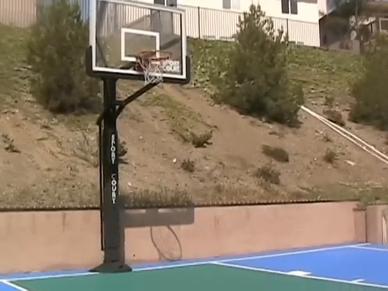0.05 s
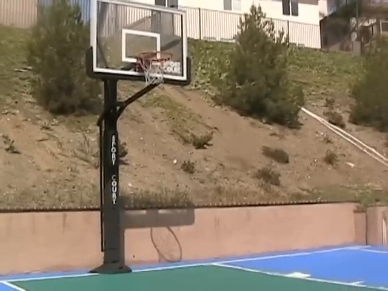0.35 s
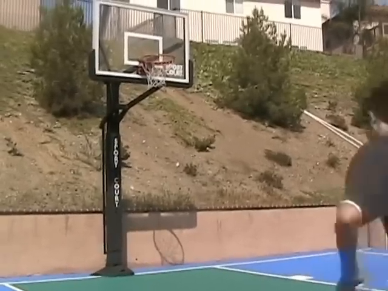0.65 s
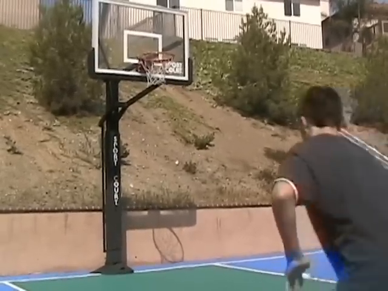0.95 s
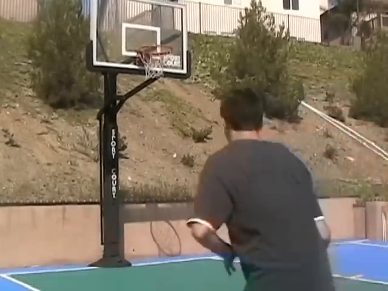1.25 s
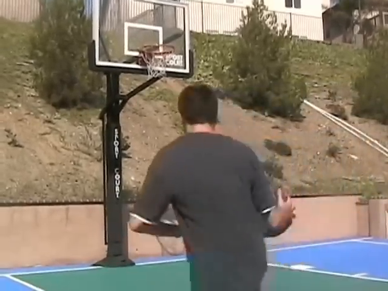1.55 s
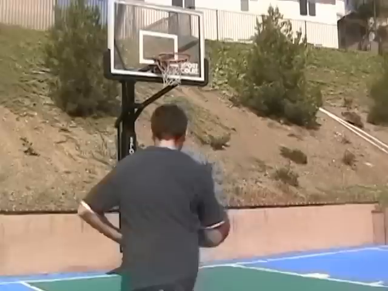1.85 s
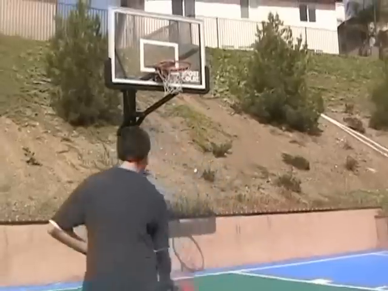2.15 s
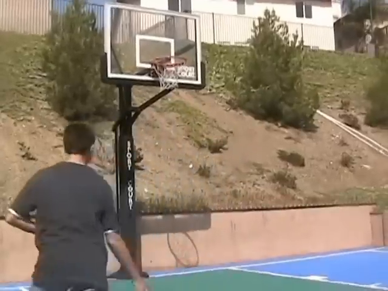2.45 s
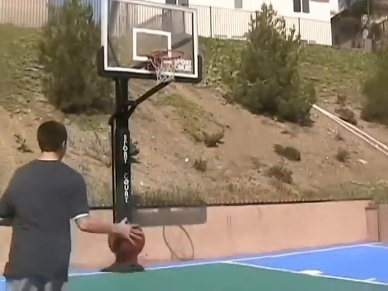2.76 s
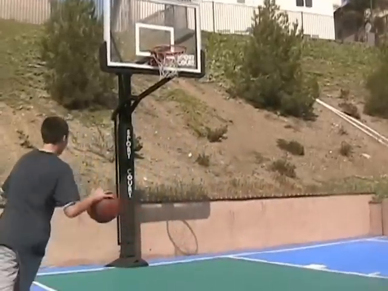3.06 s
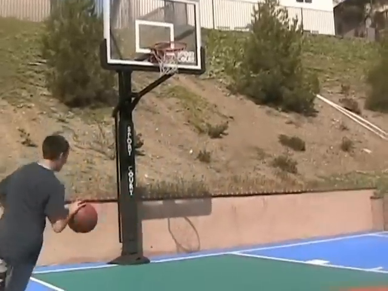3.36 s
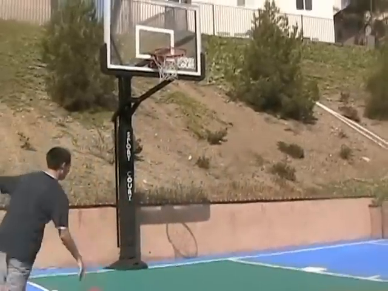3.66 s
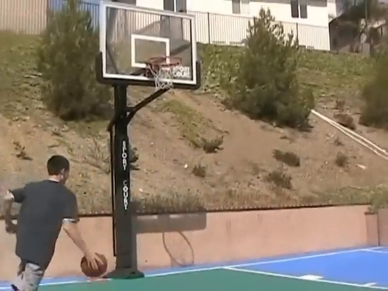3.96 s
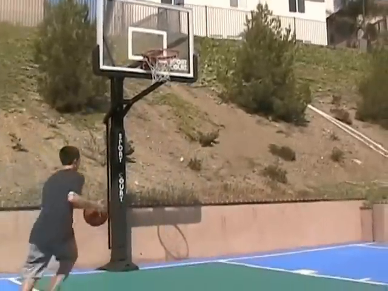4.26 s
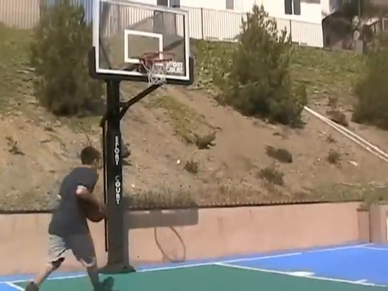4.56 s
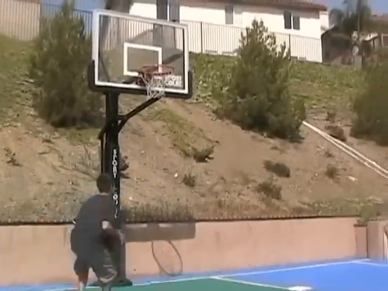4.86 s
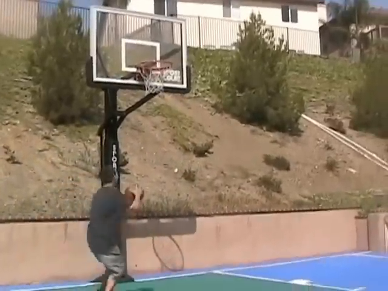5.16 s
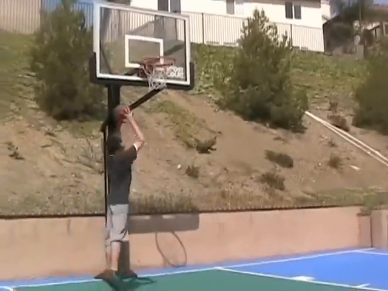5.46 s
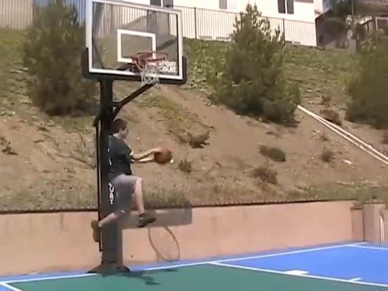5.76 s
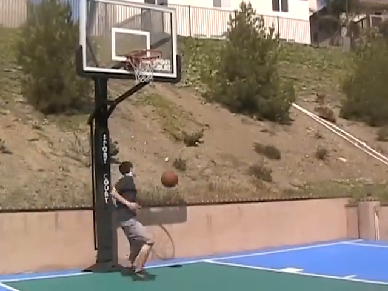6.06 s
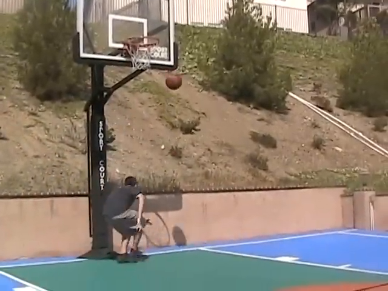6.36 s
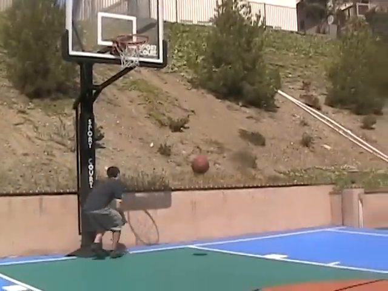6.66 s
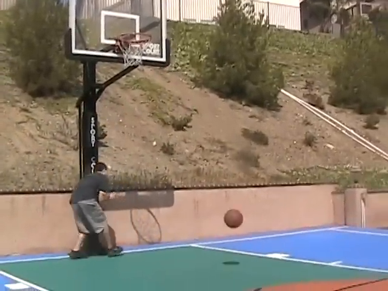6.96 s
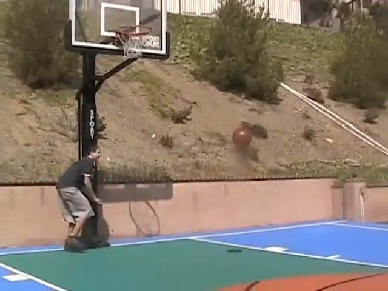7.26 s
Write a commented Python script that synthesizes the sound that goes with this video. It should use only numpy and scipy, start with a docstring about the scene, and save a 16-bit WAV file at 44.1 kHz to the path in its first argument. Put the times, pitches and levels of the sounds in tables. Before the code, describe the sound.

Over a soft outdoor rumble, three heavy basketball bounces sound in slow motion, with hollow echoes and dull, scuffing footsteps between and after them. Near the end everything returns to normal speed and pitch: one loud, sharp bounce, a lighter slap, shoes landing and one more bounce. Distant birds chirp faintly, and the microphone distorts a little on the hardest hits.

```python
"""A basketball is dribbled to the hoop on an outdoor court and laid up. Each bounce thumps, cracks and rings
the shell, and a retaining wall and the hillside throw it back. Shoes land, scuff and squeak; far birds
chirp over a bed of outdoor air. The run-up plays at half speed, an octave down, then cuts to normal speed.
The camera overloads on the bounces and notches out its own motor whine."""
import sys
import numpy as np
from scipy import signal
from scipy.fft import rfft, irfft, next_fast_len
from scipy.io import wavfile
from scipy.ndimage import uniform_filter1d

SR = 44100
rng = np.random.default_rng(int(sys.argv[2]) if len(sys.argv) > 2 else 0)


def transcribe(u):
    """Save the signal u as a 16-bit wav file named by the first command-line argument.

    u: samples, shape (n,) or (channels, n), limited to [-1, 1]; the rate is SR.
    q: integer samples, one column per channel.
    """
    v = np.clip(np.atleast_2d(u).T, -1, 1)
    q = np.round(v * 32767).astype(np.int16)
    wavfile.write(sys.argv[1], SR, q)


N = 326328
TIME = np.arange(N) / SR
SHORT = SR // 2  # samples in one knock
# Cue times are as heard. Pitches and decays are for normal speed wherever `speed` scales them.
START_S, CUT_S, SLOW = .153, 5.527, .5


def ball(speed, thump_hz=135, thump_db=-18.5, pong_hz=1150, wall_hz=3600, tail_hz=4200):
    """Each blow pushes air, slaps the skin and rings the ball; wall, hillside and court answer."""
    # ball hits: start_s, level_db, pitch_ratio, tilt_db_per_octave, crack_db, smack_db,
    # wall_distance_m, wall_echo_db, echo_air_mode_db, tail_db, echo_buzz_db
    bounces = [(.8668, -.5, 1, 0, 2, -25, 6.73, -8, -4.5, -10.5, -23),
               (2.3483, 0, 1.02, 1.5, 3.5, -21.5, 5.4, -4, -5.5, -9.5, -18.5),
               (3.7566, 0, 0.95, 2, 2, -15, 3.94, -3, -6, -11, -20),
               (5.9450, 4.5, 1.01, 1.5, 0, -21, 1.84, -6, -7, -9.5, -19),
               (6.0940, -18, 1.1, 5, 14.5, 0.5, 2, -1, -9, -10, -6),
               (6.9022, -2, .9, 0, -0.5, -5, 2.35, -10, -15, -14, -11)]
    # slap of the skin on the court: freq_hz, level_db
    crack_eq = [(200, -3), (900, -4.5), (2000, -1.5), (3400, -11), (5400, -9.5), (7000, -23.5),
                (10000, -29.5), (15000, -38.5), (17500, -63.5)]
    # buzz of the rubber shell after a hard, flat landing: freq_hz, level_db
    smack_eq = [(300, -15.5), (900, -5.5), (1600, 1), (2200, -1.5), (3000, -15.5), (4000, -33.5),
                (9000, -54), (16000, -84.5)]
    direct, scattered = np.zeros(N), np.zeros(N)
    t = np.arange(SHORT // 2) / SR * speed
    echoes = {}
    for (s, db, pitch, tilt_db, crack_db, smack_db,
         wall_m, wall_db, pong_db, tail_db, echo_buzz_db) in in_shot(bounces, speed):
        thump = amp(thump_db) * np.sin(2 * np.pi * thump_hz * t) * fade(t, 0.044)
        crack = amp(crack_db - 12) * noise(crack_eq, speed, size=len(t)) * fade(t, 0.023)
        buzz = noise(smack_eq, speed, size=len(t)) * fade(t, 0.059)
        skin = (crack + amp(smack_db) * buzz) * (1 - np.exp(-t / .0002))
        skin = lowpass(skin, 16000 * speed)
        blow = amp(db) * (ring(t, pitch, tilt_db, speed) + thump + skin)
        add(direct, s, blow)
        # the air mode and the shell's buzz radiate sideways, towards the wall
        pong = amp(db + pong_db) * np.sin(2 * np.pi * pong_hz * t) * fade(t, 0.04)
        burst_fade = fade(t, 0.021)
        side_buzz = amp(db + echo_buzz_db) * buzz * burst_fade
        echoes[s] = lowpass(wall_slap(blow, t, speed) + pong + side_buzz, wall_hz * speed, order=2)
        back_s = s + round_trip(wall_m, speed)
        add(direct, back_s, amp(wall_db) * echoes[s])
        burst = (blow + amp(db + 7) * thump) * burst_fade  # the attack and the bass carry into the tail
        add(scattered, back_s, amp(tail_db) * (burst + side_buzz))
    far_echoes = hillside(echoes, t, speed)
    tail = court(lowpass(scattered, tail_hz * speed), speed, t60=0.64, build_s=0.016, patchy_db=2.5)
    return direct + far_echoes + tail


def ring(t, pitch, tilt_db, speed, bright_hz=2300, squash_s=0.00035):
    """The modes build up as the ball squashes; the small shell radiates little bass."""
    # modes of the shell and enclosed air, before each hit's tuning and tilt: pitch_hz, level_db, t60_s
    modes = [(257, -12, 0.056), (379.7, -13.5, 0.069), (480, -20, 0.066), (735, -11.5, 0.033),
             (849, -9.5, 0.041), (988.4, -5.5, 0.055), (1104, -15, 0.077), (1297, -3, 0.03),
             (1408, -10.5, 0.021), (1613, -24.5, 0.058), (1871, -16.5, 0.031), (2260, -25, 0.045),
             (2680, -34, 0.035), (3170, -29, 0.045), (4090, -37.5, 0.029), (5330, -29, 0.026)]
    tone = np.zeros(len(t))
    for hz, db, t60 in modes:
        gain = amp(db + tilt_db * np.log2(min(hz, bright_hz) / 1100))
        tone += gain * np.sin(2 * np.pi * hz * pitch * t) * fade(t, t60)
    radiation = signal.butter(2, [330 * speed, 7000 * speed], "band", fs=SR, output="sos")
    return signal.sosfilt(radiation, tone * (1 - np.exp(-t / squash_s)))


def wall_slap(blow, t, speed, low_hz=850, top_hz=1900, bass_hz=280):
    """A blow as the wall returns it: a short, hollow midrange burst over its thump."""
    mids = lowpass(blow, top_hz * speed)
    mids = highpass(highpass(mids, low_hz * speed), low_hz * speed)
    return amp(2) * mids * fade(t, 0.047) + amp(-2) * lowpass(blow, bass_hz * speed)


def hillside(echoes, t, speed, blur_db=-3, clean_db=-6):
    """Banks and fences return the latest blow: a clean front and a blurred remainder."""
    # late echoes: start_s, level_db, blur_t60_s
    returns = [(.985, -25, .04), (1.055, -23, .06), (1.133, -21, .06), (2.461, -23, .03),
               (2.518, -21.5, .05), (2.603, -17.5, .04), (3.855, -11, .025), (3.959, -19.5, .03),
               (3.998, -22, .04), (5.975, -18, .03), (6.010, -25, .02), (7.007, -16, 0.07),
               (7.043, -22, 0.069)]
    out = np.zeros(N)
    for s, db, t60 in in_shot(returns, speed):
        echo = echoes[max(hit_s for hit_s in echoes if hit_s < s)]
        blur = unit(rng.standard_normal(len(t)) * fade(t, t60)) / np.sqrt(len(t))
        add(out, s, amp(db + clean_db) * echo)
        add(out, s, amp(db + blur_db) * signal.fftconvolve(echo, blur))
    return out


def player(speed, reverb_db=-16):
    """Shoe and hand foley, plus one hillside thump, with a light send to the court's tail."""
    foley = squeaks(speed) + steps_and_hill_thump(speed) + pats(speed) + scuffs(speed)
    return foley + amp(reverb_db) * court(foley, speed)


def steps_and_hill_thump(speed, second_pitch=0.82):
    """Double knocks: shoes land heel, then lower, grittier toe; the hillside returns one low thump."""
    # the row at 1.135 s is the first bounce's low thump, returned by the hillside; the rest are steps:
    # start_s, level_db, heard_centre_hz, grit_db, second_lag_s, second_db, thud_db, thud_hz, attack_s
    knocks = [(1.135, -24.5, 554, -18, .045, -5, -0.5, 218, 0.0017),
              (1.795, -20, 620, -10.5, 0.074, -12, -11.5, 370, 0.0025),
              (2.169, -31.5, 369, -16, 0.0095, -2.5, -11, 390, 0.0012),
              (3.197, -21, 426, -21.5, .035, -2, -10, 448, 0.0016),
              (3.958, -17, 680, -25.5, 0.045, -11.5, -11.5, 444, 0.0007),
              (4.299, -26, 435, -31, .1, -10.5, -8.5, 444, 0.00041),
              (4.475, -12, 596, -20, .038, -11.5, -11.5, 349, 0.00054),
              (4.741, -27, 670, -30, 0.036, -1, -8.5, 395, 0.00089),
              (4.833, -11, 622, -31.5, .031, 0.5, -11, 448, 0.0016),
              (5.1305, -21.5, 1050, -23, 0.026, -1.5, -13, 353, .0002),
              (5.401, -31.5, 350, -21, 0.031, 0, -5, 352, 0.00093),
              (6.048, -14.5, 700, -17.5, 0.049, 2.5, -6.5, 384, 0.0015),
              (6.352, -20, 1070, -13, 0.024, -12, -10, 400, 0.00072),
              (6.456, -23, 1132, -15.5, 0.022, 1.5, -7.5, 394, 0.003),
              (6.594, -28, 820, -24, 0.017, 2.5, -3.5, 348, 0.0034),
              (6.828, -30, 1370, -16, 0.019, -2.5, -10, 383, 0.0011)]
    out = np.zeros(N)
    for s, db, hz, grit_db, lag_s, second_db, thud_db, thud_hz, attack_s in in_shot(knocks, speed):
        first = contact(hz, grit_db, thud_db, speed, attack_s, thud_hz)
        second = contact(hz * second_pitch, grit_db + 3, thud_db - 2, speed, attack_s, thud_hz)
        add(out, s, amp(db) * first)
        add(out, s + lag_s, amp(db + second_db) * second)
    return out


def pats(speed, thud_db=-22):
    """A hand pats the ball or a sole taps the court, with hardly any thud."""
    # light slaps: start_s, level_db, heard_centre_hz, grit_db
    slaps = [(.255, -28.5, 640, -7), (1.351, -24.5, 880, -16), (1.98, -35, 1090, -33),
             (2.048, -27, 1350, -9), (3.268, -22.5, 1585, -27), (3.322, -33, 1420, -33),
             (3.439, -21.5, 740, -18), (4.478, -15, 998, -21), (4.513, -24.5, 1070, -3.5),
             (5.3, -34.5, 934, -30), (5.771, -33, 1010, -5.5), (6.071, -12, 1400, -30),
             (6.123, -15, 580, -16), (7.286, -29, 1700, -26)]
    out = np.zeros(N)
    for s, db, hz, grit_db in in_shot(slaps, speed):
        add(out, s, amp(db) * contact(hz, grit_db, thud_db, speed, attack_s=.0004, slap_t60=0.056))
    return out


def scuffs(speed):
    """A sole catches and lets go as it slides over the court."""
    # shoe drags: start_s, length_s, level_db, grit_db, heard_centre_hz
    drags = [(.153, 0.025, -39.5, -14, 716), (.774, 0.074, -34, -14, 950), (.815, 0.019, -31.5, -20, 1250),
             (1.043, 0.049, -36, -8.5, 690), (1.80, .12, -42, -12, 654), (2.49, 0.063, -33.5, -13.5, 805),
             (2.64, 0.063, -43.5, -11.5, 750), (2.78, 0.055, -50, 0, 750), (4.06, 0.068, -45.5, -14, 730),
             (4.893, 0.018, -43.5, -8.5, 1210), (6.028, 0.043, -31, -21, 1100), (5.7, .17, -54, 0, 1500),
             (6.562, 0.017, -45.5, -3.5, 3000), (6.6, .057, -47.5, -23, 1300),
             (7.175, 0.065, -45, -30, 1620), (7.252, .022, -47.5, -22, 1600)]
    out = np.zeros(N)
    t = np.arange(SHORT) / SR
    for s, length, db, grit_db, hz in in_shot(drags, speed):
        swell = np.sqrt(np.abs(np.sin(np.pi * np.minimum(t / length, 1))))
        catch = amp(2.87 * walk(220 * speed, size=SHORT))
        add(out, s, amp(db + 1) * sole(hz, grit_db, speed) * swell * catch)
    return out


def squeaks(speed):
    """Rubber sticks and slips in a wavering, harmonic squeal."""
    # shoe squeaks, as heard: start_s, length_s, start_hz, end_hz, level_db
    slips = [(.785, 0.069, 273.7, 262, -29.5), (7.19, 0.047, 460, 480, -40.5)]
    # partials of the slipping sole: harmonic, level_db
    partials = [(1, -15), (2, -14), (3, -0.5), (4, -10), (5, -11)]
    return whistle(in_shot(slips, speed), waver=0.025, tones=partials)


def contact(hz, grit_db, thud_db, speed, attack_s, thud_hz=385, slap_t60=.068):
    """One soft impact: a gritty slap, a short tap and a low thud."""
    t = np.arange(SHORT) / SR
    slap = amp(-6.5) * sole(hz, grit_db, speed) * fade(t, slap_t60)
    tap = amp(-8) * np.sin(2 * np.pi * hz * t) * fade(t * speed, 0.024)
    detune = rng.uniform(0.91, 1.1)
    thud = amp(thud_db) * np.sin(2 * np.pi * thud_hz * detune * t * speed) * fade(t * speed, 0.051)
    return (slap + tap + thud) * (1 - np.exp(-t * speed / attack_s))


def sole(hz, grit_db, speed):
    """Broad rubbery noise around hz with sandy grit on top."""
    # sand under a shoe: freq_hz, level_db
    grit_eq = [(1500, -16.5), (3000, -10.5), (5400, 9), (7500, -5), (10500, -7), (15000, -22.5),
               (17500, -56)]
    body = noise([(hz / 8, -18), (hz / 3.9, -4), (hz, 0), (hz * 2, -7), (hz * 4, -20), (hz * 12, -50)])
    grit = noise(grit_eq, speed) * amp(3.8 * walk(900 * speed, size=SHORT))
    return lowpass(body, 6000 * speed) + amp(grit_db) * unit(grit)


def court(x, speed, t60=0.52, build_s=0.011, patchy_db=3, width_db=-15, damp_hz=1400):
    """Fence, slope and shrubs scatter an uneven stereo tail that dulls as it dies."""
    # colour of the scattered tail: freq_hz, level_db
    tail_eq = [(50, -12), (120, 1), (250, 2.5), (400, 1.5), (600, -4), (800, 0), (1100, 0), (1300, -4),
               (1800, -2), (3500, -2), (6000, -9.5), (14000, -10.5)]
    t = np.arange(SR) / SR * speed
    shape = amp(patchy_db * walk(120 * speed, size=SR)) * fade(t, t60) * (1 - np.exp(-t / build_s))
    tails = []
    for _ in range(2):
        scatter = noise(tail_eq, speed, size=SR)
        dull = colour(scatter, [(damp_hz, 0), (2 * damp_hz, -20)], speed)
        treble = (scatter - dull) * fade(t, t60=1)  # shrubs soak it up
        response = unit((dull + treble) * shape)
        tails.append(signal.oaconvolve(x, response * np.sqrt(speed / SR))[:N])
    mid, side = tails
    return mid + amp(width_db) * side * np.array([[1], [-1]])


def birds(speed, chirp_s=0.0253, chirp_fall=0.131):
    """Far chirps and held notes, blurred by the slope; the flock is heard only through its scatter."""
    # falling chirps: start_s, start_hz, level_db
    calls = [(3.04, 3120, -59), (3.145, 3280, -48.5), (3.3, 3580, -46.5), (3.53, 2904, -52.5),
             (3.615, 4360, -47.5), (3.678, 4660, -46), (5.825, 4340, -43), (6.61, 5600, -55),
             (6.72, 5570, -64), (7.33, 4800, -57), (7.365, 5550, -56)]
    # held bird notes: start_s, heard_length_s, pitch_hz, level_db
    held = [(1.38, 0.6, 5164, -53.5), (3.28, 0.054, 5400, -53), (3.605, .05, 5350, -54),
            (4.89, 0.09, 2870, -51.5), (6.15, 0.18, 2917, -57.5), (6.6, 0.13, 5280, -61),
            (7.105, 0.042, 3600, -56.5), (7.12, 0.054, 2940, -53.5), (7.23, 0.09, 2950, -58),
            (7.31, .025, 3540, -55)]
    chirps = [(s, chirp_s / speed, hz * speed, hz * speed * (1 - chirp_fall), db)
              for s, hz, db in in_shot(calls, speed)]
    notes = [(s, length, hz * speed, hz * speed, db) for s, length, hz, db in in_shot(held, speed)]
    song = whistle(chirps, waver=0.019) + whistle(notes, waver=0.0036)
    nearer = amp(-.5) * song + amp(-6) * court(song, speed)
    return nearer + court(flock(speed, chirp_s), speed, t60=.25, build_s=0.0046)


def flock(speed, chirp_s, chirps_per_s=60, centre_hz=5100, spread_octaves=0.099, glide=0.066):
    """A farther flock twitters at random, some chirps rising and some falling."""
    chirps = []
    level_db = -64.5 if speed < 1 else -65.5
    for s in rng.uniform(0, TIME[-1], int(chirps_per_s * speed * TIME[-1])):
        pitch, slope, loudness = rng.standard_normal(3)
        hz = centre_hz * speed * 2 ** (spread_octaves * pitch)
        chirps.append((s, chirp_s / speed, hz, hz * (1 + glide * slope), level_db + 2.5 * loudness))
    return whistle(in_shot(chirps, speed), waver=0.014)


def air(speed):
    """Outdoor bed: distant hiss over a restless rumble, swelling and sinking during the run-up."""
    # air during the run-up, as heard: freq_hz, level_db
    slow_eq = [(22, -6.5), (55, 2.5), (130, -1), (260, -2), (550, -2.5), (1000, -5), (1900, -4.5),
               (2700, -4.5), (3700, -22), (5000, -24.5), (7000, -44.5), (9000, -51), (15000, -62)]
    # air after the cut: freq_hz, level_db
    normal_eq = [(20, -18), (45, -14), (110, 1.5), (260, -3.5), (500, -5), (1000, -4), (1800, -8.5),
                 (2800, -8.5), (5200, -8), (7500, -23), (10000, -27), (13000, -44), (16500, -52)]
    # fader ride on the run-up's air: time_s, level_db
    swell = [(0.45, -54), (1.76, -50), (3.79, -51), (4.56, -54), (5.13, -53), (5.45, -53.5)]
    mid, side = (noise(slow_eq if speed < 1 else normal_eq, size=N) for _ in range(2))
    mid = mid + lowpass(mid, 350 * speed, order=1) * (amp(4.9 * walk(9 * speed)) - 1)
    side = colour(side, [(100, 5.5), (500, -5.5), (2000, -16.0), (6000, -12.5), (12000, 6.5)], speed)
    level_db = np.interp(TIME, *np.transpose(swell)) + 2 if speed < 1 else -52.5
    return amp(level_db) * (mid + side * np.array([[1], [-1]]))


def whistle(rows, waver, tones=((1, 0),), flutter_db=2):
    """Gliding, fluttering tones that swell and die; tones lists harmonic, level_db."""
    out = np.zeros(N)
    for s, length, start_hz, end_hz, db in rows:
        progress = np.linspace(0, 1, int(length * SR))
        wobble = 1 + waver * walk(149.6, size=SR)[:len(progress)]
        hz = (start_hz + (end_hz - start_hz) * progress) * wobble
        phase = 2 * np.pi * np.cumsum(hz) / SR
        gain = amp(db + flutter_db * walk(90, size=SR)[:len(progress)])
        swell = np.sqrt(8 * progress * (1 - progress))
        add(out, s, gain * swell * sum(amp(tone_db) * np.sin(k * phase) for k, tone_db in tones))
    return out


def motor_comb(x, speed, motor_hz=299.6, hold=0.62):
    """A comb subtracts a running mean of past motor turns; clicks come out with a short flutter."""
    lag = int(round(SR / (motor_hz * speed)))
    turns = np.pad(x, ((0, 0), (0, -N % lag))).reshape(2, -1, lag)  # one row per motor turn
    return signal.lfilter([1, -1], [1, -hold], turns, axis=1).reshape(2, -1)[:, :N]


def amp(db):
    """Decibels to gain."""
    return 10 ** (np.asarray(db) / 20)


def unit(x):
    """Scale to rms 1."""
    return x / np.sqrt(np.mean(x ** 2))


def fade(t, t60):
    """Exponential decay, 60 dB down at t60."""
    return np.exp(-np.log(1000) * t / t60)


def along(points, hz):
    """Read a curve of freq_hz, value points on a log-frequency axis."""
    freqs, values = np.transpose(points)
    return np.interp(np.log(hz + 1), np.log(freqs), values)


def colour(x, points, speed=1):
    """An EQ curve that moves with the playing speed."""
    size = next_fast_len(len(x), True)
    gain = amp(along(points, np.fft.rfftfreq(size, 1 / SR) / speed))
    return irfft(rfft(x, size) * gain, size)[:len(x)]


def noise(points, speed=1, size=SHORT):
    """Coloured noise of rms 1."""
    return unit(colour(rng.standard_normal(size), points, speed))


def walk(rate_hz, size=N):
    """Smooth random wander with a spread near 1."""
    step = int(SR / rate_hz)
    return 1.46 * uniform_filter1d(np.repeat(rng.standard_normal(size // step + 1), step), step)[:size]


def lowpass(x, hz, order=4):
    """Causal low-pass."""
    return signal.sosfilt(signal.butter(order, hz, fs=SR, output="sos"), x)


def highpass(x, hz):
    """Causal second-order high-pass."""
    return signal.sosfilt(signal.butter(2, hz, "high", fs=SR, output="sos"), x)


def round_trip(metres, speed, sound_m_per_s=343):
    """Seconds until an echo returns, at this playing speed."""
    return 2 * metres / sound_m_per_s / speed


def add(track, s, sound):
    """Mix a sound into a track at time s."""
    i = int(s * SR)
    track[i:i + len(sound)] += sound[:N - i]


def in_shot(table, speed):
    """The cues before the cut at slow speed, those after it at normal speed."""
    return [row for row in table if (row[0] < CUT_S) == (speed < 1)]


def shot(speed, bass_cut_hz=70):
    """The full mix at one speed; the small microphone drops the deep bass of ball and player."""
    return highpass(ball(speed) + player(speed), bass_cut_hz * speed) + birds(speed) + air(speed)


def scene():
    """A moment of silence, slow motion up to the cut, normal speed after it."""
    return np.where(TIME < CUT_S, shot(SLOW), shot(1)) * (TIME > START_S)


def record(dry, ceiling=0.697, top_hz=16300):
    """Mismatched microphone ports, an overloading input, the motor comb and a steep top cut."""
    # phase lead of the left port: freq_hz, lead_rad
    left_lead = [(30, 1.9), (60, 1.35), (110, 0.85), (200, 0.3), (2000, 0.027), (4000, 0.21), (6000, 0.45),
                 (11000, 1.7), (16000, .2)]
    # extra bass in the left port over the right: freq_hz, level_db
    left_bass = [(100, 1), (300, 0.07)]
    size = next_fast_len(N, True)
    hz = np.fft.rfftfreq(size, 1 / SR)
    sides = np.array([[.5], [-.5]])
    mismatch = amp(along(left_bass, hz) * sides) * np.exp(1j * along(left_lead, hz) * sides)
    ports = irfft(rfft(dry, size) * mismatch, size)[:, :N]
    clipped = np.clip(ports, -ceiling, ceiling)
    combed = np.where(TIME < CUT_S, motor_comb(clipped, SLOW), motor_comb(clipped, 0.99))
    return signal.sosfilt(signal.ellip(8, .2, 70, top_hz, fs=SR, output="sos"), combed)


dry = scene()
out = record(dry)
transcribe(out)
```